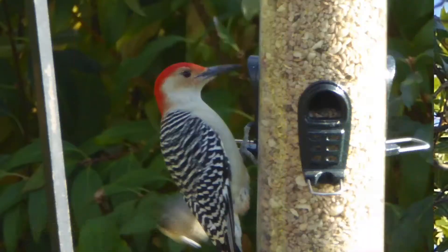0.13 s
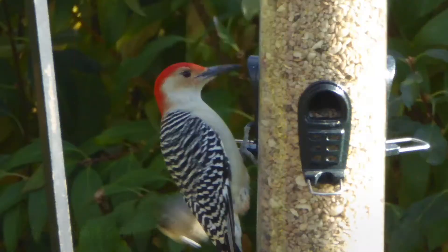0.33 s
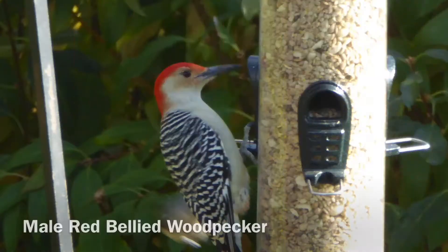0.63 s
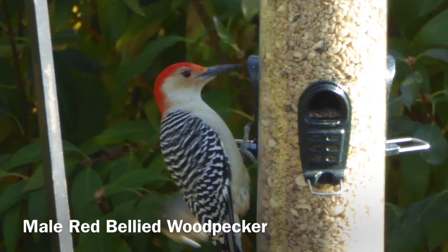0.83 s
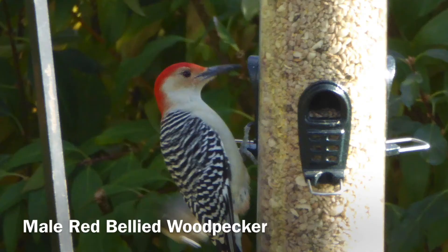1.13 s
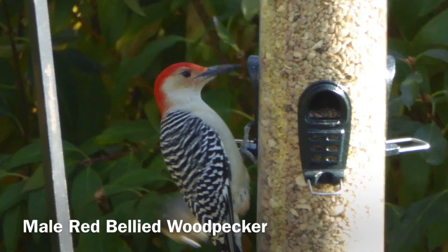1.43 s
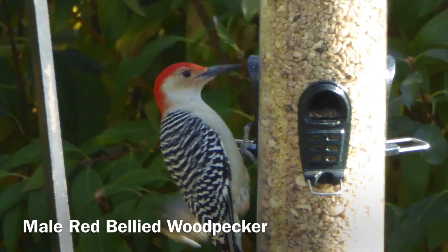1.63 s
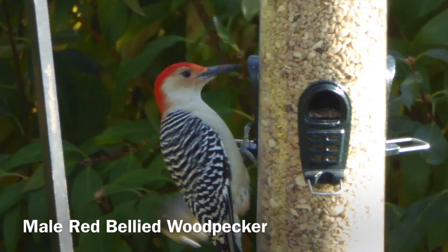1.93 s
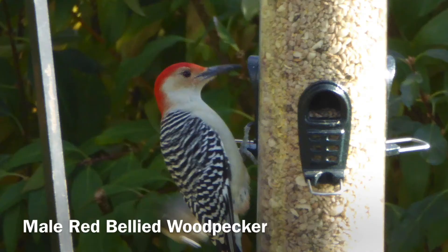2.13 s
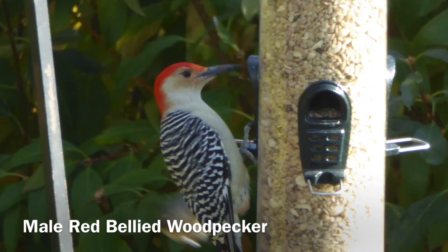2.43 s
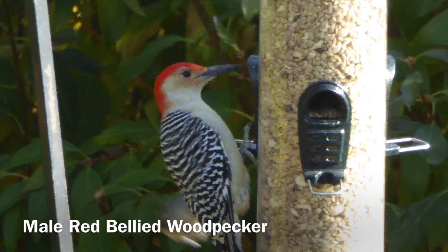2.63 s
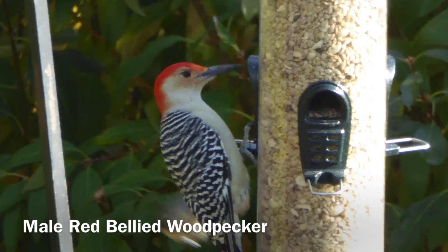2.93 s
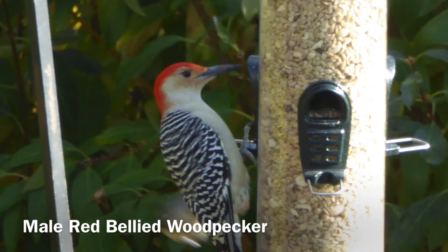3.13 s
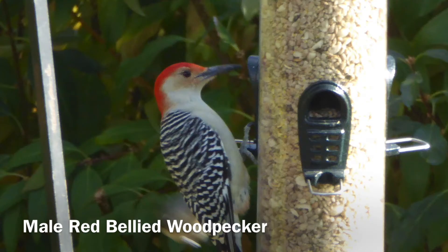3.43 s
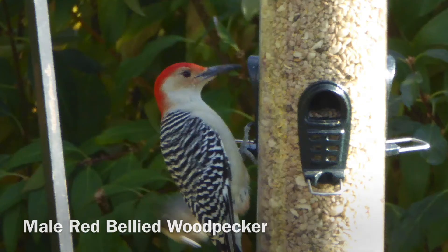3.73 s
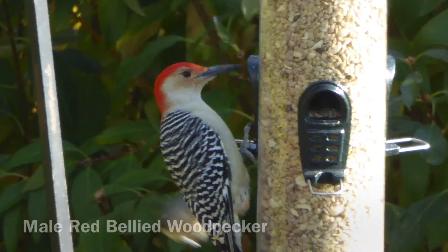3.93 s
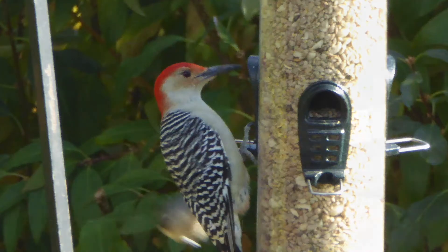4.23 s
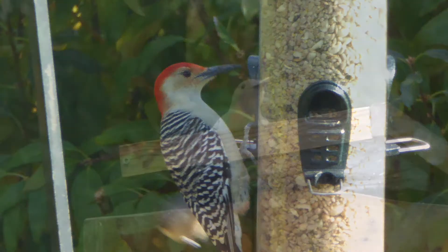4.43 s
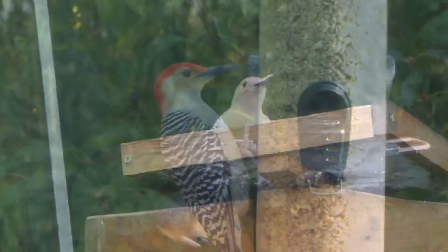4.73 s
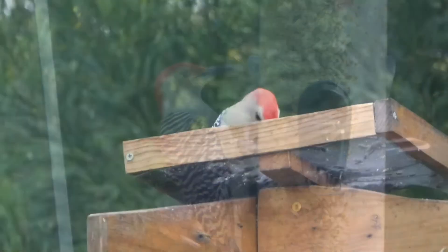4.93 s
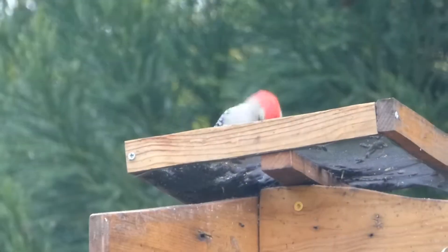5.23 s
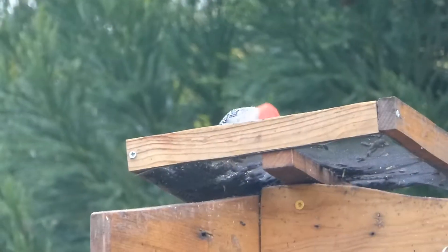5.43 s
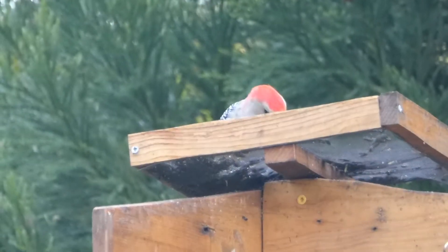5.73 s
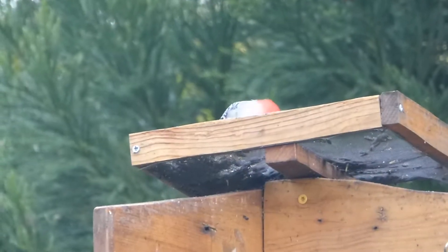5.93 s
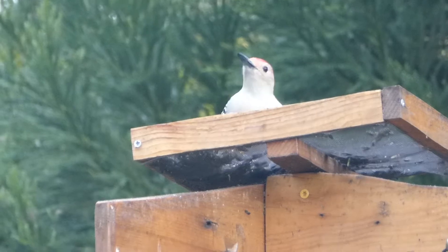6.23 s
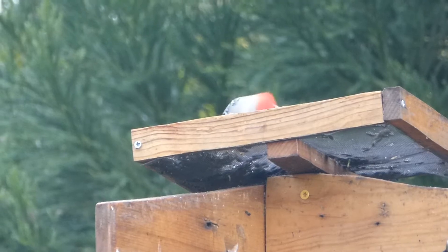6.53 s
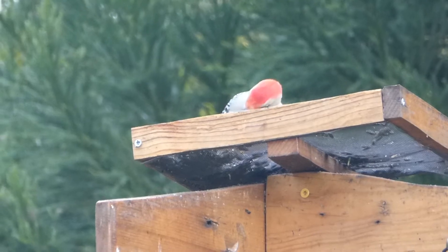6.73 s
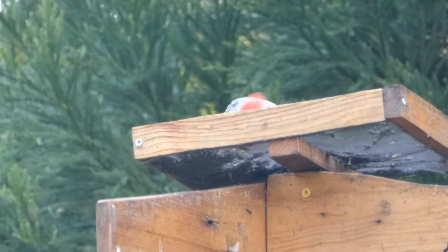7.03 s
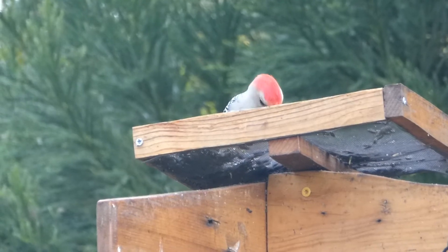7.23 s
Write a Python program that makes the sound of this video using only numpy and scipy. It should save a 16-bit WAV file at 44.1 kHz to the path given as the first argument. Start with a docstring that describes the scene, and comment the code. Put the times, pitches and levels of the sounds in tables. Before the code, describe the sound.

From near silence, a soft outdoor hiss of distant rustle and traffic fades in over the first second. A faint, dry, high insect trill buzzes from about 0.45 to 0.9 s. At 1.6 s a woodpecker close to the microphone gives a loud churr lasting about a third of a second: a quick opening slur, then six rapid warbles at about 22 per second, bright and throaty, fraying into a breathy rasp. Short leafy echoes follow. The insect trills again around 2.9-3.3 s, and tiny distant songbirds whistle thin, mostly falling notes from 3.4 s. A second, similar churr comes at 4.0 s. More faint bird chirps run from 4.6 to 6.4 s, with another insect trill at 5.4-5.8 s. The third churr sounds at 6.6 s. Last faint chirps and a far insect shimmer come near 7.2 s, over steady hiss and a barely audible wavering low hum.

```python
"""A garden's faint hiss fades in with a buzzing insect trill; then a woodpecker gives three loud churrs close by.
Each churr slurs in, warbles about 22 times a second and rasps out: harmonic pulses and puffs of air, shaped
by a windpipe filter that changes as the beak closes. Short echoes surround the bird.
Behind it lie thin gliding whistles of songbirds, insect trills made of fast falling chirps and a far insect
band of throbbing noise, the hiss of filtered noise, and a very faint wavering hum."""
import sys
import numpy as np
from scipy import signal
from scipy.io import wavfile
from scipy.ndimage import uniform_filter1d

SR = 44100
rng = np.random.default_rng(int(sys.argv[2]) if len(sys.argv) > 2 else 0)


def bounce(signal):
    """Save signal as a 16-bit WAV file at the path given by the first command-line argument."""
    frames = np.transpose(np.atleast_2d(signal))
    limited = np.clip(frames, -1, 1)
    pcm = np.round(limited * 32767).astype(np.int16)
    wavfile.write(sys.argv[1], SR, pcm)


def volts(x):
    """Linear amplitude factor 10**(x/20) for a level x in dB, scalar or array-like."""
    e = np.asarray(x, float) / 20
    return 10 ** e


N = 325017  # length in samples

# Levels in the tables are those ahead of the fade.
# churrs: (start [s], roll start [s], warble rate [1/s], top of opening slur [Hz], slur boost [dB], closing rasp [s])
CHURR_CALLS = [(1.6, 1.6525, 22.25, 1265, 0.3, .034), (3.992, 4.046, 21.97, 1300, 1.5, .027),
               (6.568, 6.623, 21.97, 1355, -1.8, .026)]
# opening slur: (time after the start [s], pitch [share of the top], effort before the boost [dB],
# treble [dB], roughness [0-1])
OPENING_SLUR = [(0, .7, -20, -13, .2), (.004, .82, -30, -4, .15), (.014, 1.001, -20.3, 0.2, .03),
                (.025, .96, -18, -3, .03)]
# pitch at the trough before each warble and after the last, ahead of the register break: (pitch [Hz])
TROUGH_HZ = [1141, 1147, 1110, 1097, 1118, 1180, 1000]
# pitch at the crest of each warble, ahead of the carry-over and the register break: (pitch [Hz])
CREST_HZ = [1605, 1632, 1638, 1672, 1657, 1590]
# closing rasp, pitch ahead of the register break: (time from its end point in the roll [s], pitch [Hz],
# effort [dB], treble [dB], roughness [0-1])
CLOSING_RASP = [(-.012, 1040, -28, -8, .45), (0, 1080, -28.5, -14, .48), (.018, 1080, -66, -10, .35)]
# crests where the voice snaps up to the windpipe resonance: (middle [s], length [ms])
RESONANCE_SNAPS = [(1.6783, 2.1), (1.7216, 3.3), (1.7696, 3.8), (1.819, 4), (1.896, 5), (4.073, 2.8),
                   (4.115, 3.1), (4.164, 3.9), (4.2157, 12), (4.2489, 2.8), (4.293, 5.2), (6.649, 5),
                   (6.693, 2.5), (6.738, 2.5), (6.7867, 3), (6.833, 4), (6.877, 7)]
# windpipe with the beak open: (frequency [Hz], gain [dB])
OPEN_THROAT = [(100, -79.5), (700, -40.5), (1100, -14.5), (1650, -1), (2050, 5), (2300, -4.5), (2700, -5.5),
               (3200, -5), (3600, -3), (4200, -19), (4900, -14), (5500, -15.5), (6500, -9), (7500, 4),
               (8200, -9.5), (8750, -19.5), (9900, -19.5), (11200, -21.5), (12500, -38), (13600, -17),
               (14800, -14.5), (16500, -35)]
# windpipe as the beak closes towards the end of a churr: (frequency [Hz], gain [dB])
CLOSED_THROAT = [(100, -76), (700, -43), (1100, -18), (1600, -0.5), (2150, 0), (2600, -6), (3150, -4.5),
                 (3600, -17.5), (4200, -22), (4900, -19.5), (5450, -28), (6400, -5), (7500, -14.5),
                 (8200, -13.5), (8700, -27.5), (9900, -9), (11000, -30), (12000, -60), (13300, -35.5),
                 (14800, -22.5), (16500, -29.5)]
# early echoes from nearby trunk, branches and ground: (delay [ms], level [dB])
EARLY_ECHOES = [(1.3, -14), (2.9, -13), (5.2, -15), (8.1, -17), (12.7, -20)]
# near insect: (start [s], end [s], level once swelled [dB])
NEAR_TRILLS = [(0.45, 0.868, -60), (2.94, 3.342, -59.5), (5.425, 5.842, -60)]
# far insects: (time [s], level [dB])
FAR_CHORUS = [(0.9, -90), (1.15, -82), (1.58, -77), (2.0, -87), (2.7, -75), (3.36, -77), (3.54, -85),
              (3.96, -72), (4.4, -80), (4.84, -84), (5.27, -78.5), (5.95, -77), (6.05, -87), (7.0, -86),
              (7.23, -71), (7.37, -78)]
# songbirds, one slur each: (start [s], length [ms], start pitch [Hz], end pitch [Hz], level midway [dB])
BIRD_SLURS = [(1.007, 70, 5850, 5200, -77), (1.15, 50, 5900, 5300, -79), (3.4, 16, 4950, 4400, -78),
              (3.425, 25, 4120, 3450, -78), (3.53, 53, 5700, 5200, -78.5), (3.587, 13, 5000, 5800, -71),
              (3.6, 75, 5800, 5000, -75), (3.6, 59, 7600, 6650, -78), (3.75, 40, 7300, 6400, -78),
              (7.23, 40, 3750, 3100, -77), (3.75, 35, 5400, 4800, -78), (4.635, 25, 5600, 5150, -76),
              (5.385, 30, 6300, 5100, -79), (4.76, 50, 5580, 4900, -79), (4.87, 47, 4080, 3400, -77),
              (5.11, 83, 3440, 4570, -80.5), (5.3, 84, 4500, 3520, -78), (5.745, 32, 4100, 4800, -79),
              (5.78, 50, 5550, 4900, -74), (5.929, 71, 6000, 4640, -71), (5.95, 36, 7500, 6630, -76),
              (5.95, 38, 3730, 3200, -75), (6.0, 50, 5640, 4900, -77), (7.24, 18, 4500, 4650, -70),
              (7.282, 22, 5400, 5000, -72)]
# a nearer songbird, an arch and then a hooked fall: (start [s], arch length [ms], arch level midway [dB],
# hook start pitch [Hz], hook level midway [dB])
BIRD_ARCHES = [(4.648, 58, -78, 6100, -71.5), (6.333, 59, -75, 6800, -67.5), (6.39, 53, -80, 6700, -66),
               (7.174, 54, -73.5, 6000, -70)]
# colour of the hiss: (frequency [Hz], relative level per Hz [dB])
HISS_COLOUR = [(20, -54.5), (60, -31.5), (134, -19.5), (200, -21), (270, -1), (500, -1), (750, 2),
               (1250, -3.5), (1500, -8.5), (2200, -13), (3100, -17.5), (5800, -20.5), (10000, -23),
               (16200, -22.5)]
# low hum: (time [s], level [dB])
HUM_LEVEL = [(1.5, -94), (2.07, -83.5), (2.48, -100.5), (4.44, -115), (5.51, -85), (5.72, -100), (6.0, -95),
             (6.93, -91), (7.37, -99)]
# fade-in of the whole mix: (time [s], gain [dB])
FADE_IN = [(0, -69), (.25, -27.5), (.5, -14), (.75, -6.5), (1.0, -0.5), (1.5, 1.29)]


def turns(start, roll, rate, top_hz, slur_db, rasp):
    """Maps a churr's pitch and effort turns: rows (s, Hz, effort dB, treble dB, roughness) as the voice tires."""
    tire_power, fray_power = 4.0, 7.0  # how late the voice tires and frays
    k, j = np.arange(len(TROUGH_HZ)), np.arange(len(CREST_HZ))
    low, high = k / k[-1], j / j[-1]  # progress through the roll, 0-1
    tired = low ** tire_power

    trough_s = roll + k / rate
    trough_db = -18.5 - 10.2 * tired
    trough_treble_db = np.where(k, -4.3 - 4 * tired, -9.5)  # shriller than the crests at first, save the first
    trough_rough = .035 + .24 * low ** fray_power
    troughs = np.transpose([trough_s, TROUGH_HZ, trough_db, trough_treble_db, trough_rough])

    crest_s = roll + (j + .5 + .085 * high ** 2) / rate  # the crest comes later in its warble as the roll goes on
    usual_top_hz = 1300  # a higher slur carries over into the first crest
    crest_hz = CREST_HZ + (j == 0) * (top_hz - usual_top_hz)
    crest_db = -17.4 - 1.2 * high
    crest_treble_db = -8.5 + 0 * j
    crest_rough = .17 + .24 * high ** fray_power
    crests = np.transpose([crest_s, crest_hz, crest_db, crest_treble_db, crest_rough])

    opening = np.array(OPENING_SLUR) * [1, top_hz, 1, 1, 1] + [start, 0, slur_db, 0, 0]
    closing = np.array(CLOSING_RASP) + [trough_s[-1] + rasp, 0, 0, 0, 0]
    rows = np.vstack([opening, troughs, crests, closing])
    return rows[np.argsort(rows[:, 0])]


def churr(rows):
    """Pulses on a warbling pitch, with jitter and puffs of air, pass the windpipe."""
    break_hz, break_width_hz, break_jump_hz = 1370, 50, 57.4  # the warble skips between two registers
    break_db, break_treble_db = -1.5, 7.5  # there it falters and turns shrill
    snap_hz = 2100  # windpipe resonance
    s, turns_hz, *columns = np.transpose(rows)
    t = np.arange(s[0], s[-1], 1 / SR)
    effort_db, treble_db, rough = (np.interp(t, s, c) for c in columns)

    # pitch: rounded turns, then the register break
    place = np.interp(t, s, np.arange(len(s)))
    eased = place // 1 + .5 - .5 * np.cos(np.pi * (place % 1))
    hz = np.interp(eased, np.arange(len(s)), turns_hz)
    off_hz = hz - break_hz
    rolling = np.clip((t - s[0] - .035) / .01, 0, 1)  # 0 in the opening slur, 1 after it
    hz = hz + rolling * break_jump_hz * (np.tanh(off_hz / break_width_hz) - off_hz / 270)
    falter = rolling * np.exp(-(off_hz / 100) ** 2)
    rough = np.clip(rough + .06 * falter, 0, 1)

    # only the lowest partial is caught by the resonance; the snap roughens the overtones
    lowest_hz = hz
    for at, ms in RESONANCE_SNAPS:
        lowest_hz = lowest_hz + (snap_hz - lowest_hz) * np.exp(-abs((t - at) * 2000 / ms) ** 3)
    rough = np.clip(rough + .14 * (lowest_hz - hz) / (snap_hz - break_hz), 0, 1)

    shake, air = rng.standard_normal((2, len(t)))
    jitter = .25 * rough * evened(band(shake, 80, 500))
    cycles = np.cumsum(hz * (1 + jitter)) / SR

    # the pulse shape keeps changing in the roll: each partial from the fourth up flickers on its own
    wander = evened(band(rng.standard_normal((len(t), 20)).T, 40, 360))
    flicker_db = 2.6 * (1 + 4.5 * np.minimum(rough, .2)) * rolling * wander
    flicker_db[:4] = 0
    flicker_db[3] -= 15 * rough  # a rasp dulls the third partial
    overtones = np.zeros(len(t))
    for k in range(2, 20):
        overtones += volts(flicker_db[k]) * np.cos(2 * np.pi * k * cycles) * (k * hz < 18000)
    lowest = np.cos(2 * np.pi * (cycles + np.cumsum(lowest_hz - hz) / SR))
    lowest_gain = np.clip(1 - 0.98 * rough, 0, 1)  # a rasp loses its fundamental
    pulses = np.sqrt(2) * (overtones + lowest_gain * lowest)

    # air puffs out once a cycle
    puffs = band((.3 + np.exp(-(cycles % 1) / .3)) * air, 1500, 17000)
    drive = (1 - .6 * rough) * pulses + 4.5 * rough * evened(puffs)
    treble = signal.filtfilt(*signal.butter(2, 4500, "high", fs=SR), drive)
    drive = drive + (volts(treble_db + break_treble_db * falter) - 1) * treble
    source = volts(effort_db + break_db * falter) * signal.windows.tukey(len(t), .025) * drive

    shut = np.clip((t - s[0]) / (s[-1] - s[0]), 0, 1) ** 0.76  # the beak closes, fastest at first
    voice = coloured((1 - shut) * source, OPEN_THROAT) + coloured(shut * source, CLOSED_THROAT)
    return s[0], voice


def bounced(x):
    """Early single reflections, treble only: they break up the fast-sweeping overtones."""
    out, treble = x.copy(), band(x, 6800, 17000)
    for ms, db in EARLY_ECHOES:
        add(out, ms / 1000, volts(db) * treble[:N - SR])
    return out


def garden(x, t60, low_hz, high_hz):
    """A diffuse echo from leaves and walls: decaying noise that falls 60 dB in t60 seconds."""
    t = np.arange(SR // 2) / SR
    tail = rng.standard_normal(len(t)) * volts(-60 * t / t60) * (t > .004)
    return signal.fftconvolve(band(x, low_hz, high_hz), tail / np.linalg.norm(tail))[:N]


def songbirds():
    """Slurs, arches and hooks; moving air makes them flicker, distance dulls them."""
    out = np.zeros(N)
    for s, ms, start_hz, end_hz, db in BIRD_SLURS:
        middle_hz = start_hz + .55 * (end_hz - start_hz)
        add(out, s, glide(ms, start_hz, middle_hz, end_hz, db))
    hook_end_hz = 4980
    for s, ms, db, hook_hz, hook_db in BIRD_ARCHES:
        add(out, s, glide(ms, 2620, 4620, 2340, db, octave=volts(1.5)))  # a strong octave
        middle_hz = hook_hz + .78 * (hook_end_hz - hook_hz)
        add(out, s + .047, glide(40, hook_hz, middle_hz, hook_end_hz, hook_db))
    flicker = volts(2.6 * evened(band(rng.standard_normal(N), 35, 150)))
    return band(out * flicker, 2000, 10200)


def glide(ms, start_hz, middle_hz, end_hz, db, octave=0):
    """A whistled near-sine on a parabola through three pitches, softening by 6 dB on its way."""
    u = np.linspace(-1, 1, round(ms * SR / 1000))
    slope, bend = (end_hz - start_hz) / 2, (start_hz + end_hz) / 2 - middle_hz
    phase = 2 * np.pi * np.cumsum(middle_hz + slope * u + bend * u ** 2) / SR
    tone = np.sin(phase) + octave * np.sin(2 * phase)
    return np.sqrt(2) * volts(db - 3 * u) * tone * signal.windows.tukey(len(u), .3)


def insects():
    """The near one clicks out falling chirps that slow down; the far ones blur into a band."""
    strokes_per_s, slowing_per_s = 105, -13  # at the start, and the change by the end
    swell_db, swell_share, swell_hz = -9, .33, -300  # starts soft and low, swells over its first part
    near = np.zeros(N)
    for start, end, db in NEAR_TRILLS:
        u = np.linspace(0, 1, round((end - start) * SR))
        soft = np.maximum(1 - u / swell_share, 0)
        stroke = np.cumsum(strokes_per_s + slowing_per_s * u) / SR % 1
        chirp = np.sin(2 * np.pi * np.cumsum(7700 - 2300 * stroke + swell_hz * soft) / SR)
        shape = np.sin(np.pi * np.clip(stroke / .72, 0, 1)) ** 2
        scrape = 1 + 0.28 * evened(band(rng.standard_normal(len(u)), 50, 600))
        level = volts(db + swell_db * soft) * signal.windows.tukey(len(u), .06)
        add(near, start, level * shape * scrape * chirp)
    t = np.arange(N) / SR
    throb = 1 + .5 * evened(band(rng.standard_normal(N), 90, 115))
    far = evened(throb * band(rng.standard_normal(N), 6300, 7000))
    return near + volts(np.interp(t, *np.transpose(FAR_CHORUS))) * far


def hiss():
    """Distant rustle and traffic: random short-time spectra with faint patches."""
    frames, hz = N // 256 + 5, np.fft.rfftfreq(1024, 1 / SR)
    real, imaginary, patches = rng.standard_normal((frames, 513, 3)).T
    patches = uniform_filter1d(patches, size=12, axis=0)
    patches_db = .8 * evened(uniform_filter1d(patches, size=20, axis=1))
    spectra = (real + 1j * imaginary) * volts(read(HISS_COLOUR, hz)[:, None] + patches_db)
    noise = signal.istft(spectra, nperseg=1024, noverlap=768)[1][:N]
    return volts(-58.5) * evened(noise)


def hum():
    """A low wavering tone near 140 Hz that comes and goes."""
    t = np.arange(N) / SR
    waver = evened(uniform_filter1d(rng.standard_normal(N), size=8000))
    tone = np.sqrt(2) * np.sin(2 * np.pi * np.cumsum(140 + 1.2 * waver) / SR)
    return volts(np.interp(t, *np.transpose(HUM_LEVEL))) * tone


def read(points, hz):
    """Joins a spectrum by straight lines on a log-frequency axis."""
    f, value = np.transpose(points)
    return np.interp(np.log(hz + 1), np.log(f + 1), value)


def evened(x):
    """Scales to rms 1."""
    return x / np.sqrt(np.mean(x ** 2) + 1e-20)


def add(mix, s, sound):
    """Lays a sound into the mix at time s."""
    part = mix[round(s * SR):][:len(sound)]
    part += sound[:len(part)]


def coloured(x, points):
    """Causal (minimum-phase) filter with the given spectrum."""
    log_gain = np.log(volts(read(points, abs(np.fft.fftfreq(4096, 1 / SR)))))
    taps = np.fft.ifft(np.exp(np.conj(signal.hilbert(log_gain)))).real[:2048]
    return signal.oaconvolve(x, taps)[:len(x)]


def band(x, low_hz, high_hz):
    """Band-pass."""
    return signal.sosfilt(signal.butter(2, [low_hz, high_hz], "bandpass", fs=SR, output="sos"), x)


def scene():
    """The bird with its echoes over the background."""
    bird = np.zeros(N)
    for call in CHURR_CALLS:
        add(bird, *churr(turns(*call)))
    short_echo = volts(-22) * garden(bird, .06, 1500, 16000)
    long_echo = volts(-35) * garden(bird, 0.55, 1400, 3600)
    near = bounced(bird) + short_echo + long_echo
    small, buzz = songbirds(), insects()
    small = small + volts(-5.5) * garden(small, .2, 2000, 12000)
    buzz = buzz + volts(-7.5) * garden(buzz, .15, 5000, 9000)
    return (near + small + buzz + hiss() + hum())[None]


def band_limit(x):
    """A steep low-pass at the top of the band."""
    return signal.sosfilt(signal.butter(12, 16330, fs=SR, output="sos"), x)


def record(dry):
    """Fades the mix in and limits its band to 15.9 kHz."""
    faded = dry * volts(np.interp(np.arange(N) / SR, *np.transpose(FADE_IN)))
    lowpass = signal.firwin(511, 15900, window=("kaiser", 9), fs=SR)
    limited = signal.oaconvolve(faded, lowpass[None], "same")
    return band_limit(limited)


dry = scene()
out = record(dry)
bounce(out)
```